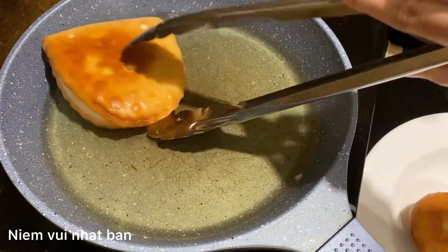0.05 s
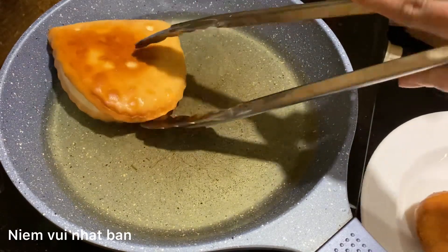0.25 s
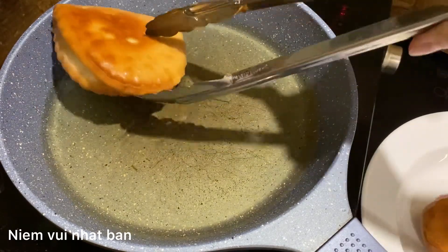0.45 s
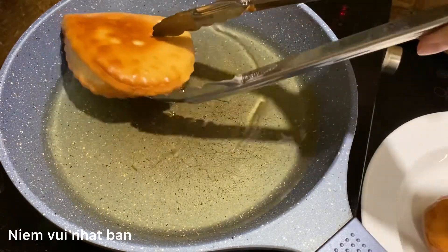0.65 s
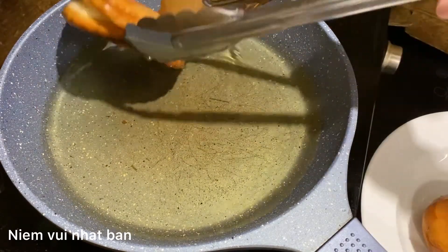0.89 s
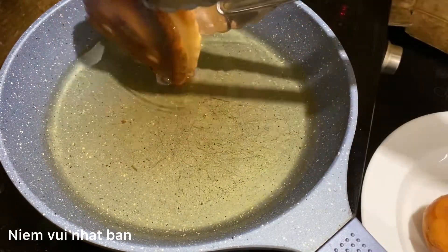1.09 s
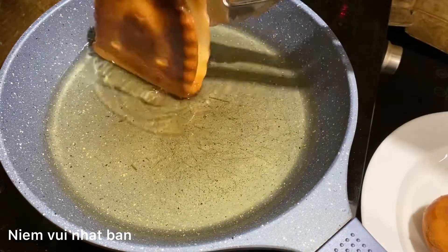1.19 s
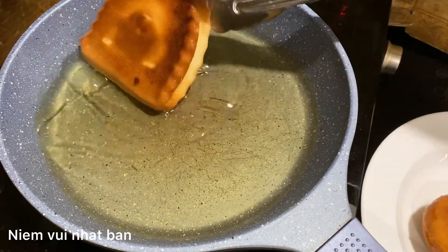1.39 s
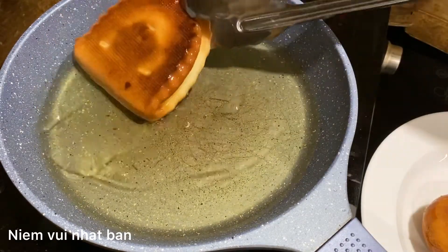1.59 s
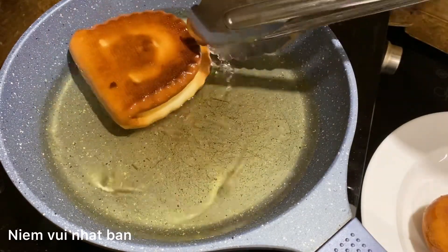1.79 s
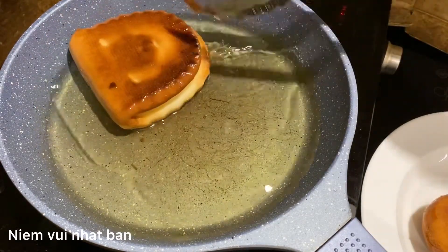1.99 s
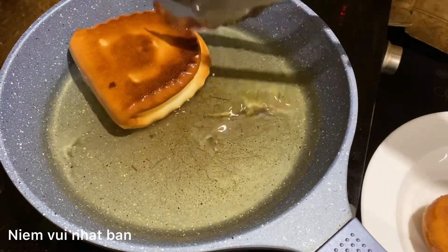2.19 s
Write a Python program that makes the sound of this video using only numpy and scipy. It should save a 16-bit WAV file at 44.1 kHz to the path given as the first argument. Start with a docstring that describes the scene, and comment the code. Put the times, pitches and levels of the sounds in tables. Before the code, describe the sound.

Close in a small kitchen, metal tongs clack hard on a pan rim after faint ticks, rattle briefly, pause, then scrape and tick lightly, over constant low airy fan hum, picked up by a handheld phone.

```python
"""In a small kitchen an extractor fan hums: shaped noise for air, wavering sines for blade tone, overtones and mains.
Steel tong tips tick and scrape over pan and crust: bursts of random grains rung through tip resonances.
The tongs knock once on the rim of a frying pan and bounce: decaying modes under a short noise rattle,
with a longer noise jangle after the first blow. A decaying noise tail answers as the room."""
import sys
import numpy as np
from scipy import signal
from scipy.fft import rfft, irfft, next_fast_len
from scipy.io import wavfile
from scipy.ndimage import uniform_filter1d, map_coordinates

SR = 44100
rng = np.random.default_rng(int(sys.argv[2]) if len(sys.argv) > 2 else 0)


def nominal_scale(level):
    """Amplitude ratio for a level in decibels (scalar or array-like)."""
    x = np.asarray(level, float) / 20
    return 10 ** x


def generate_wav(signal):
    """Clip the signal to [-1, 1] and save it as 16-bit WAV at the path in sys.argv[1]."""
    frames = np.transpose(np.atleast_2d(signal))
    scaled = np.clip(frames, -1, 1) * 32767
    pcm = np.round(scaled).astype(np.int16)
    wavfile.write(sys.argv[1], SR, pcm)


N = 99225
T = np.arange(N) / SR

# fan air, relative spectrum: f/Hz, level/dB per Hz
AIR_SPECTRUM = [(15, -110), (28, -75), (42, -64), (90, -67), (130, -71.5), (180, -75), (230, -70.5),
                (270, -71.5), (330, -73), (390, -72), (445, -64), (490, -73), (580, -71), (640, -65.5),
                (780, -68.5), (900, -72.5), (1000, -71), (1150, -74.5), (1350, -79), (1560, -78),
                (1850, -83.5), (2280, -81), (2700, -89), (5000, -93), (6500, -103), (8500, -101),
                (11000, -103), (15500, -104), (16600, -115)]
# likeness of the air at left and right: f/Hz, correlation
AIR_ALIKE = [(40, 1), (130, 0.3), (290, 0.48), (640, 0.75), (850, 0.061), (1400, 0.079), (2100, 0.59),
             (4000, 0.3), (5000, 0.27), (6500, 0.52), (9000, 0.2)]
# stereo tilt of the air: f/Hz, left over right/dB
AIR_BALANCE = [(60, 0.5), (150, 6), (380, 5), (950, 2.5), (2380, 1.5), (5980, 5.5), (15000, -3.5)]
# fan tones: multiple of blade rate, left rms level/dB, left over right/dB, unsteadiness/dB
FAN_TONES = [(1, -51, -2, 1.3), (2, -49.5, 6.5, -1), (4, -50, 8, 1.7)]
# ticks and scrapes of the tips: t/s, hiss rms level/dB, rise/s, t60/s, body over hiss/dB
SCRAPES = [(0.0386, -44, 0.0023, 0.023, 6), (.11, -47, .005, 0.045, 0), (0.129, -62, 0.0037, 0.044, 3),
           (.153, -42.5, 0.0037, 0.046, -2.5), (.176, -53, .004, .06, 3.5), (.198, -48.5, .006, 0.084, -1),
           (.212, -38.5, 0.0024, 0.052, -11), (.81, -55, .004, 0.055, -5),
           (1.058, -45, 0.0017, 0.065, -2.5), (1.088, -45.5, 0.003, 0.2, -3),
           (1.104, -33, 0.0037, 0.15, -7), (1.145, -59, .004, 0.063, 1),
           (1.165, -41.5, 0.0019, 0.039, -1.5), (1.222, -57.5, .012, 0.24, 2),
           (1.252, -47, 0.014, 0.29, -1.5), (1.301, -45.5, 0.017, 0.15, -2.5), (1.33, -61, .012, 0.13, 3),
           (1.615, -57.5, .004, 0.21, 3.5), (1.65, -60, 0.013, 0.13, -1), (1.695, -59, 0.017, .15, 3.5),
           (1.722, -55, 0.015, 0.056, 6.5), (2.17, -48, .003, 0.054, -2)]
# bright part of a scrape, relative spectrum: f/Hz, level/dB per Hz
HISS_SPECTRUM = [(4000, -46), (7000, -19.5), (8500, 19), (9800, -6.5), (11500, -9), (13300, 7), (15000, 4),
                 (16500, -29)]
# duller part of a scrape, relative spectrum: f/Hz, level/dB per Hz
BODY_SPECTRUM = [(900, -25), (1800, -10.5), (3200, -4.5), (4400, 1.5), (5500, -3), (7500, -6), (10500, -12),
                 (16500, -60)]
# resonances of the steel tips: f/Hz, width/Hz, level/dB
TIP_MODES = [(9670, 1100, 12), (9860, 190, 12), (10970, 280, 7), (2540, 730, -0.5), (6390, 210, 1),
             (5100, 230, -23)]
# decay of the kitchen's answer: f/Hz, t60/s
ROOM_DECAY = [(150, 0.27), (1000, 0.34), (4000, 0.18), (12000, 0.37)]
# blows on the pan: t/s, level/dB, softness/Hz above which the contact loses force
BLOWS = [(.2270, -8, 3000), (.2348, -11, 1200), (.2935, -17, 1500), (.315, -26, 1500)]
# damped body modes, rung by every blow: f/Hz, level/dB, t60/s, left over right/dB, left lead/rad
PAN_MODES = [(309, -21, 0.19, -16, -1.4), (488.2, -8.5, .12, 5.5, 0.95), (590, -11, 0.088, 10, 1.86),
             (727, -7, 0.041, 0, 1.5), (1113, -3, 0.013, -14, 0), (408, -17, 0.1, 2, 1.7),
             (1179, -12, 0.073, 2, 1.4), (1432, -2, 0.04, -1.5, -1.5), (1601, -7.5, 0.057, -1, 1),
             (1750, -10, 0.042, -11.5, -0.5), (2173, -8.5, 0.032, 5, 1.2), (2670, -17, 0.053, -1, 3.7)]
# free modes of the steel tongs, rung by the first blow only: # f/Hz, level/dB, t60/s, left over right/dB, left
# lead/rad, build-up/s
TONG_MODES = [(81.4, -21.5, 0.45, 4, 1.2, 0.055), (176, -23, 0.25, 2, 2.2, 0.027),
              (946, -3, .13, -11, -1.3, .005), (959, -3.5, .37, 14, 2.6, .04),
              (2230, -14, .27, 16, -.6, .0005), (3140, -24.5, 0.056, 12.5, 0.7, 0.00041),
              (3655, -28, 0.13, 10, 0, 0.00063), (4942, -26.5, 0.11, 12, 1, 0.00067),
              (5082, -27.5, 0.15, 18.5, 2.3, .003), (5310, -28, 0.11, -1, -1, .0005),
              (6660, -25.5, .15, 6, -1.7, .0005)]
# rattle and jangle, relative spectrum: f/Hz, level/dB per Hz
CLATTER_SPECTRUM = [(100, -12), (250, 2.5), (900, 2.5), (1800, -8), (3000, -18), (5200, -25), (8000, -28.5),
                    (10500, -28.5), (16500, -44)]
# phase between the microphone channels: f/Hz, right lead/rad
MIC_LEAD = [(2100, -.1), (4100, -1.3), (5300, -.6), (6900, .6), (7600, 1.6), (8200, 3.1), (8900, 3.4),
            (9600, 4.7), (10300, 6.1), (11700, 6.4), (12400, 8.6), (12900, 9.4), (13900, 9.5),
            (14500, 10.8), (15200, 12), (15800, 12.55)]
# how much of the channels' difference survives: f/Hz, level/dB
MIC_SIDE = [(40, -13), (150, -10), (350, -3), (600, 0), (6500, 0), (8100, -3), (8500, -11), (9000, -5),
            (9800, -4), (11000, -18), (12300, -4), (12900, -26), (13800, -26), (14600, -5), (15800, -20)]


def unit(x):
    """Scale to rms 1."""
    return x / np.sqrt(np.mean(x ** 2) + 1e-20)


def along(points, hz):
    """Read (Hz, value) points on a log frequency axis."""
    f, v = np.transpose(points)
    return np.interp(np.log(hz + 1), np.log(f + 1), v)


def wobble(rate):
    """A smooth random curve with rate knots a second."""
    knots = rng.standard_normal(int(N * rate / SR) + 4)
    return map_coordinates(knots, [T * rate])


def filtered(x, response):
    """Multiply the spectrum of x by a response of frequency, complex or real."""
    m = next_fast_len(N + SR // 2)
    hz = np.fft.rfftfreq(m, 1 / SR)
    return irfft(rfft(x, m) * response(hz), m)[..., :N]


def coloured(x, spectrum):
    """Shape x by (Hz, dB) points, then level it to rms 1."""
    return unit(filtered(x, lambda hz: nominal_scale(along(spectrum, hz))))


def burst(s, rise, t60):
    """Envelope peaking at s: bell-shaped rise, exponential fall."""
    u = T - s
    fall = nominal_scale(-60 * np.maximum(u, 0) / t60)
    return np.where(u < 0, np.exp(-(u / rise) ** 2), fall)


def fan_air():
    """Rushing air: patchy broadband noise, its stereo likeness and balance varying with frequency."""
    air_db, swell_db, patch_db = -39, 1.2, 0.75
    z = signal.stft(rng.standard_normal((2, N)), nperseg=512)[2]
    patches = uniform_filter1d(rng.standard_normal(z.shape[1:]), size=5, axis=0)
    patches = uniform_filter1d(patches, size=10, axis=1)
    pair = signal.istft(z * nominal_scale(patch_db * unit(patches)), nperseg=512)[1][:, :N]

    def mid_side(hz):
        # splitting power by this angle sets the left-right correlation
        angle = np.arccos(np.clip(along(AIR_ALIKE, hz), -1, 1)) / 2
        return nominal_scale(along(AIR_SPECTRUM, hz)) * [np.cos(angle), np.sin(angle)]

    mid, side = filtered(pair, mid_side)
    stereo = np.array([mid + side, mid - side])
    air = filtered(stereo, lambda hz: nominal_scale(along(AIR_BALANCE, hz) * [[.5], [-.5]]))
    return nominal_scale(air_db + swell_db * wobble(5.6)) * unit(air)


def blade_tones():
    """Blade tone and overtones: sines locked to one wavering rate, each with an unsteady level."""
    blade_hz, waver_hz = 272, 0.405
    phase = 2 * np.pi * np.cumsum(blade_hz + waver_hz * wobble(4.99)) / SR
    out = np.zeros((2, N))
    for multiple, db, pan_db, unsteady_db in FAN_TONES:
        level_db = db + unsteady_db * wobble(8.22) - np.array([[0], [pan_db]])
        tone = np.sin(multiple * phase + rng.uniform(0, 2 * np.pi))
        out += np.sqrt(2) * nominal_scale(level_db) * tone  # sqrt(2) turns rms into peak
    return out


def mains_hum():
    """A steady-pitched mains sine whose level drifts."""
    mains_hz, mains_db, drift_db = 99.7, -54.5, 4.5
    return np.sqrt(2) * nominal_scale(mains_db + drift_db * wobble(2.34)) * np.sin(2 * np.pi * mains_hz * T)


def fan():
    """The extractor: rushing air, blade tones and mains hum together."""
    return fan_air() + blade_tones() + mains_hum()


def tip(f):
    """Response of the steel tips: the direct sound plus a bandpass resonance for each mode."""
    return 1 + sum(nominal_scale(db) * 1j * f * w / (c * c - f * f + 1j * f * w) for c, w, db in TIP_MODES)


def scrapes():
    """Dense friction grains ring the steel tips, split into a bright hiss and a duller body."""
    grains_per_s, spread_db, alike = 3000, 3.5, 0.62
    shape = (2, 2, N)  # hiss and body, left and right
    hits = rng.random(shape) < grains_per_s / SR
    grains = hits * rng.standard_normal(shape) * nominal_scale(spread_db * rng.standard_normal(shape))
    # mix some of the left grains into the right
    grains[:, 1] = alike * grains[:, 0] + np.sqrt(1 - alike ** 2) * grains[:, 1]
    hiss = coloured(filtered(grains[0], tip), HISS_SPECTRUM)
    body = coloured(filtered(grains[1], tip), BODY_SPECTRUM)
    out = np.zeros((2, N))
    for s, db, rise, t60, body_db in SCRAPES:
        out += nominal_scale(db) * burst(s, rise, t60) * (hiss + nominal_scale(body_db) * body)
    return out


def room(x):
    """The kitchen's answer: a noise tail in which each frequency dies at its own speed."""
    hz, t, z = signal.stft(rng.standard_normal((2, SR // 2)), SR, nperseg=256)
    decay = nominal_scale(-60 * t / along(ROOM_DECAY, hz)[:, None])
    tail = signal.istft(z * decay, SR, nperseg=256)[1]
    delayed = np.pad(x, ((0, 0), (200, 0)))  # 200 samples
    return signal.fftconvolve(delayed, tail / np.linalg.norm(tail[0]), axes=1)[:, :N]


def rattle_and_jangle():
    """Coloured noise: a short rattle over every blow, and the loose tongs jangling on after the first."""
    rattle_db, rattle_t60, jangle_db, jangle_t60 = -6, 0.058, -17, 0.32
    rattle, jangle = coloured(rng.standard_normal((2, 2, N)), CLATTER_SPECTRUM)
    first_s, first_db, _ = BLOWS[0]
    out = nominal_scale(first_db + jangle_db) * burst(first_s, 0.00021, jangle_t60) * jangle
    for s, db, _ in BLOWS:
        out += nominal_scale(db + rattle_db) * burst(s, 0.00016, rattle_t60) * rattle
    return out


def ring(modes, s, db, soft_hz):
    """Decaying modes started at s, each radiating its own way; a soft contact rings high modes less."""
    scatter_db = 1.2
    t, side = np.maximum(T - s, 0), np.array([[.5], [-.5]])
    out = np.zeros((2, N))
    for hz, level_db, t60, pan_db, lead, rise in modes:
        start_db = db + level_db + scatter_db * rng.standard_normal() + side * pan_db
        force = 1 / (1 + (hz / soft_hz) ** 2)
        envelope = nominal_scale(start_db - 60 * t / t60) * (1 - np.exp(-t / rise))
        out += force * envelope * np.sin(2 * np.pi * hz * t + side * lead)
    return out


def pan_body():
    """Every blow rings the damped modes of the pan body."""
    attack_s = .0003
    modes = [tuple(mode) + (attack_s,) for mode in PAN_MODES]
    return sum(ring(modes, s, db, soft_hz) for s, db, soft_hz in BLOWS)


def tong_ring():
    """The first blow sets the steel tongs ringing in their free modes, with no loss for softness."""
    s, db, _ = BLOWS[0]
    return ring(TONG_MODES, s, db, np.inf)


def scene():
    """Tongs and pan with the kitchen's answer, over the fan."""
    knocks = rattle_and_jangle() + pan_body()
    ringing = tong_ring()
    tips = scrapes()
    answer = room(nominal_scale(-8) * knocks + nominal_scale(-15) * ringing + nominal_scale(-12) * tips)
    return knocks + ringing + tips + answer + fan()


def top_cut(x):
    """Nothing passes above the cut-off."""
    return signal.sosfilt(signal.butter(12, 16810, fs=SR, output="sos"), x)


def record(dry):
    """The phone's two microphone channels: width and relative phase vary with frequency."""
    mid = (dry[0] + dry[1]) / 2
    side = filtered((dry[0] - dry[1]) / 2, lambda hz: nominal_scale(along(MIC_SIDE, hz)))
    stereo = np.array([mid + side, mid - side])
    # half of the phase lead goes to each channel, with opposite signs
    mix = filtered(stereo, lambda hz: np.exp(1j * along(MIC_LEAD, hz) * [[-.5], [.5]]))
    return top_cut(mix)


dry = scene()
out = record(dry)
generate_wav(out)
```